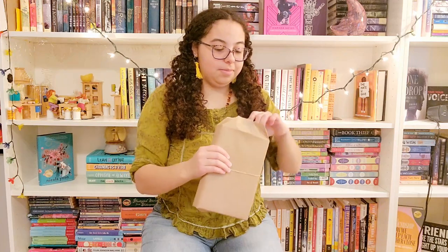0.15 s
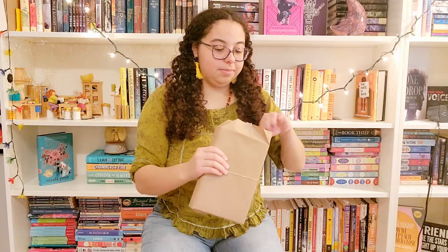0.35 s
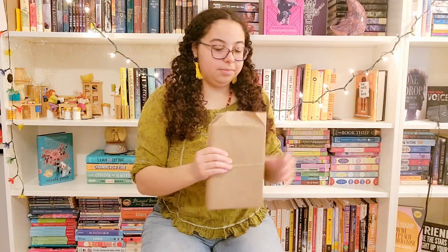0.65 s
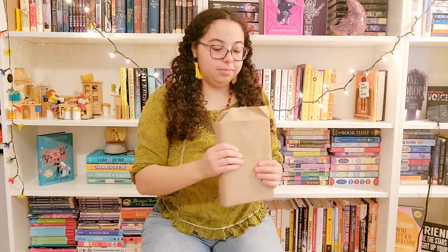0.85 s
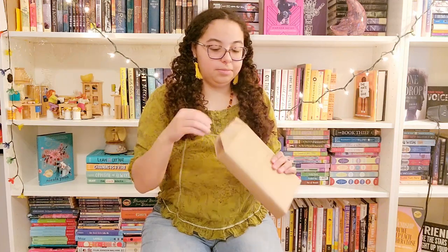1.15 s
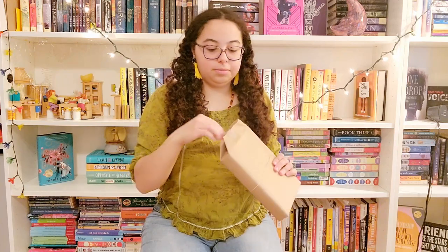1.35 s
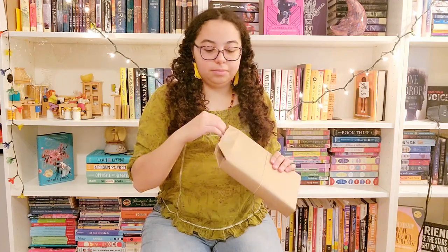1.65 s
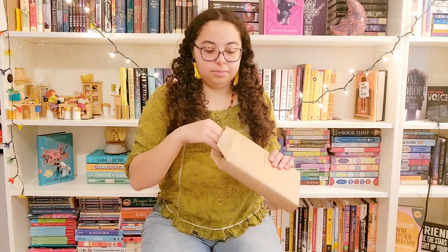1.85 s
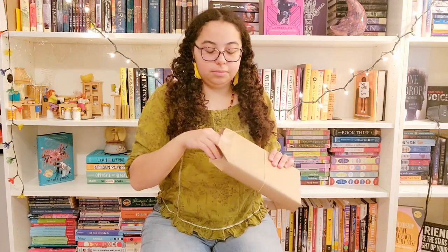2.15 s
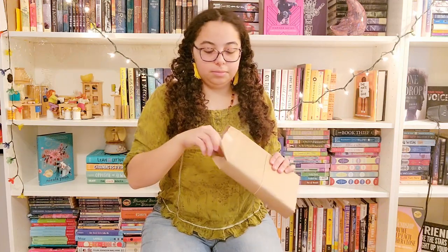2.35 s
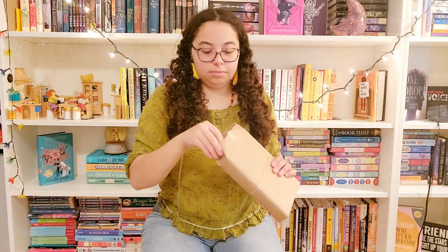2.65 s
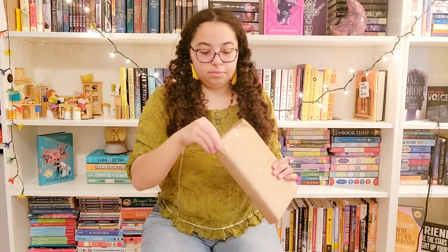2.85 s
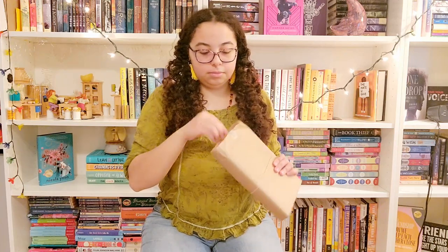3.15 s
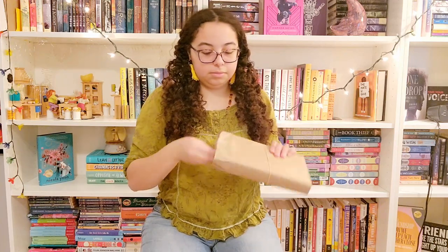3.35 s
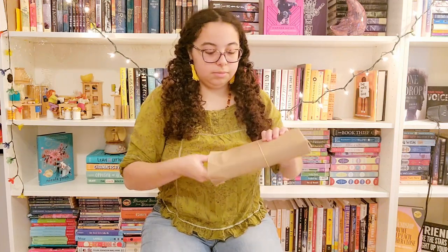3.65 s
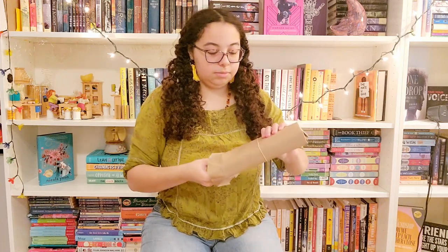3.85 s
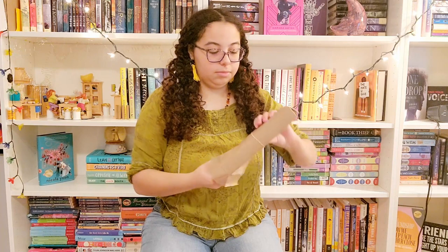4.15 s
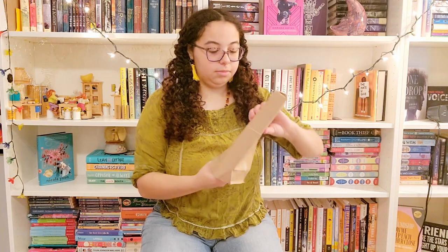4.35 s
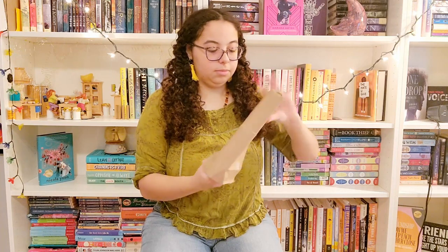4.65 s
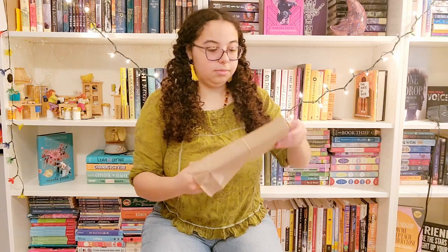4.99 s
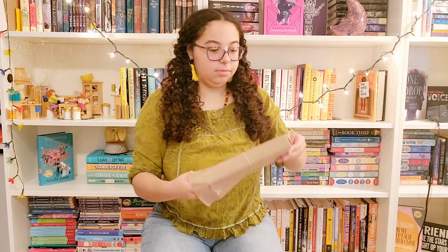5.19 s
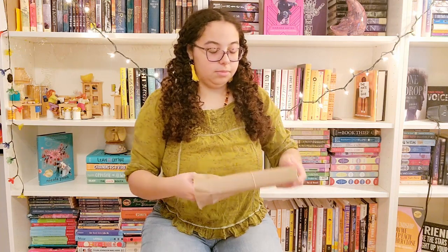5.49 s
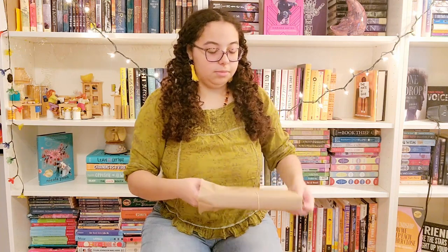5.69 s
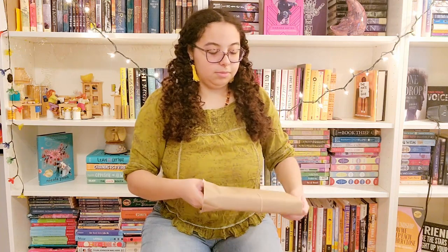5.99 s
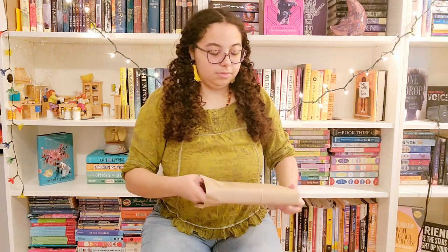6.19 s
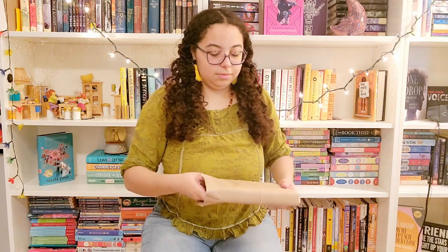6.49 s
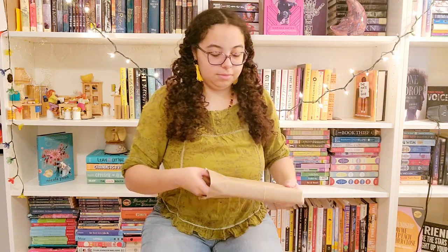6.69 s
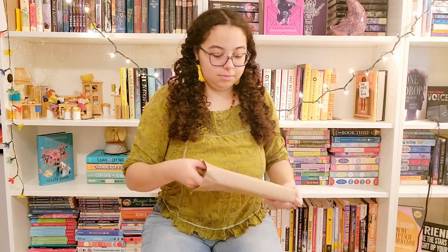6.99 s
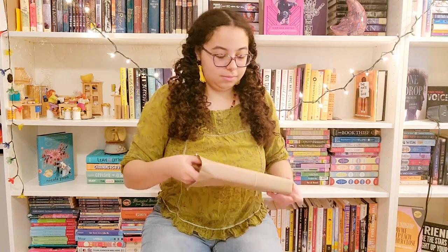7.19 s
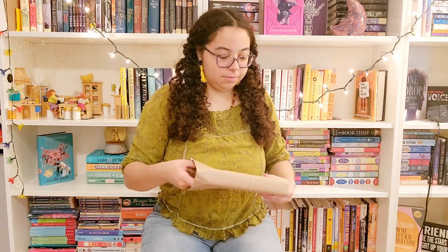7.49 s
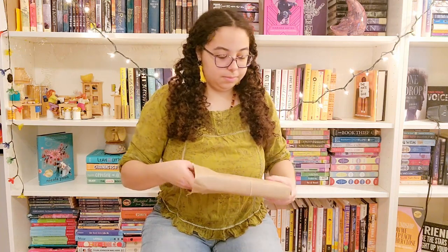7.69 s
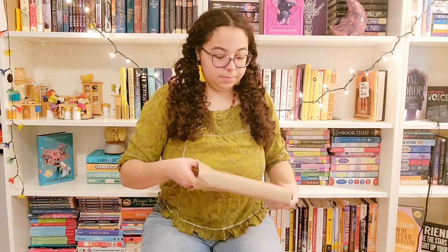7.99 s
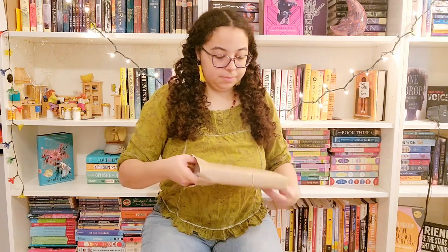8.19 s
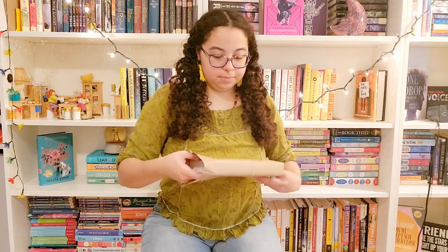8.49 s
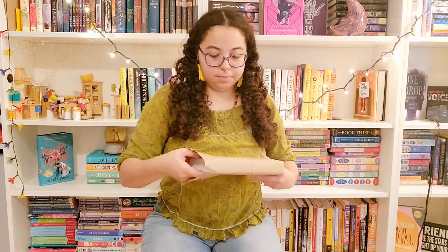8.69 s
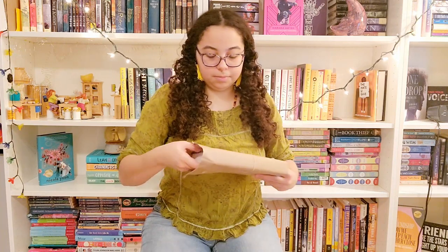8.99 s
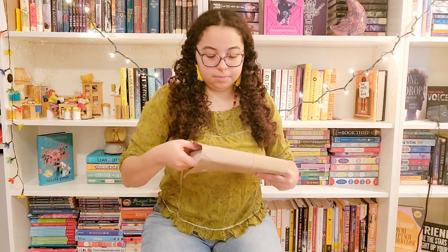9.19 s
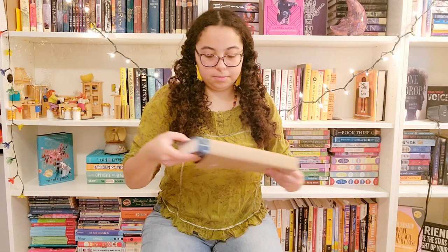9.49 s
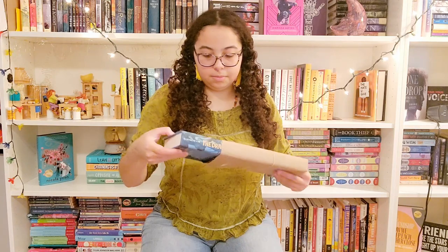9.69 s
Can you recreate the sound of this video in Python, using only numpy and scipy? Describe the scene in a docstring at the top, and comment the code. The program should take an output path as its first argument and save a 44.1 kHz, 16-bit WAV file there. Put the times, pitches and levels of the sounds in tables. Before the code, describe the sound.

Irregular crinkling of heavy wrapping paper around a book, with a few dull knocks and a strong sliding rustle near the end.

```python
"""Hands turn a book wrapped in kraft paper, pick its folded end open and slide the book out, in a small room.
From the start the stiff sheet snaps, crackles and rubs; a firm low knock comes just before 0.8 s.
Softer knocks follow, most closely around 3.5 s, then two hard, higher ones near 8.6 and 8.7 s.
The strongest rub and more loud snaps come after 9.3 s; a faint hum, rumble and hiss last throughout.
Paper is made of short noise bursts, tiny clicks and brief rings; knocks and hum are sine waves."""
import sys
import numpy as np
from scipy import signal
from scipy.fft import rfft, irfft, next_fast_len
from scipy.io import wavfile
from scipy.ndimage import map_coordinates

SR = 44100
rng = np.random.default_rng(int(sys.argv[2]) if len(sys.argv) > 2 else 0)


def output_pcm(signal):
    """Save a mono or channel-first signal as 16-bit PCM at the path in sys.argv[1].

    Samples are clipped to [-1, 1] before scaling.
    """
    pcm = np.clip(np.atleast_2d(signal).T, -1, 1) * 32767
    wavfile.write(sys.argv[1], SR, np.round(pcm).astype(np.int16))


N = 433944

# The sheet buckles, levels relative: t/s, time the crease takes to give/s, facet pitch f/Hz,
# level/dB, hollowness/dB, brightness/dB
BUCKLES = [(.0613, 0.0012, 1410, -33.5, -9, 5.5), (.125, 0.015, 1500, -41, -5, -3.5),
           (0.1804, 0.0012, 1590, -23, -12, -6.5), (0.3813, 0.012, 2060, -32, -11, -19.5),
           (0.3972, .002, 2100, -34, -12, 1), (0.7046, .004, 1800, -44.5, -7, -14.5),
           (.741, .006, 1850, -29, -2, -9), (.7453, 0.008, 1980, -22, -12, -9.5),
           (0.8824, 0.0011, 2700, -44, -22, 11), (0.8963, 0.00092, 2100, -36, -8.5, 10),
           (0.9447, 0.005, 1740, -44.5, -8, -27.5), (1.3884, 0.0035, 1920, -36, -12, -3.5),
           (1.475, .005, 1430, -43, -17, -16.5), (1.5033, 0.0087, 1110, -37.5, -13, -8.5),
           (1.734, 0.00031, 1820, -28.5, -31, -46), (1.768, 0.0083, 1900, -47.5, 6.5, 0.5),
           (1.8293, 0.0014, 2200, -39, -4, -23), (1.9305, 0.0046, 1770, -41, -8, -3),
           (2.105, .008, 1420, -44, -17, -29), (2.16, 0.0037, 1640, -34, -5.5, -10),
           (2.2815, .0013, 1890, -26, 1.5, 4.5), (2.297, 0.00093, 1460, -22, -2, 6.5),
           (2.3505, 0.0016, 1500, -27, -27, -23), (2.438, 0.00086, 1320, -25, -23, -18),
           (2.4599, 0.00065, 1740, -31.5, -21, -10.5), (2.6564, 0.0048, 1620, -38, -23, -28.5),
           (2.688, .0004, 1330, -37.5, 0.5, -33.5), (2.8116, 0.0013, 1330, -30, -14.5, -44),
           (2.824, .001, 1720, -37, -3, -5.5), (2.85, 0.0014, 1350, -31, -12, -54),
           (2.9353, 0.0017, 1500, -33, -25, -31), (3.265, 0.0045, 2100, -26.5, -4.5, -6.5),
           (3.269, 0.0017, 1740, -22, -17, -13.5), (3.2912, .0025, 1130, -28, -14, -23),
           (3.3395, 0.0018, 2200, -38, -1.5, -10), (3.3883, 0.002, 1910, -40.5, -13, -24),
           (3.556, 0.0021, 2100, -37, 4, -21), (3.7026, 0.0013, 1400, -43, -1, -1.5),
           (3.9999, 0.00077, 2980, -30.5, -13, 1.5), (4.004, 0.00067, 2400, -43, 2, 9),
           (4.1323, 0.0017, 1640, -42, 7, -29), (4.3446, 0.0035, 1650, -37.5, -4, -1),
           (4.3622, 0.0023, 2800, -24.5, -9, -5.5), (4.4607, 0.00048, 1560, -29.5, -13.5, -15.5),
           (4.543, .0026, 1820, -43, 0, -8.5), (4.6344, .0014, 1620, -26, -13, 1.5),
           (4.902, .004, 2570, -52, -2, -13.5), (4.989, .007, 1900, -51, -3, -8),
           (5.0832, 0.0021, 1480, -28.5, -13.5, -3.5), (5.154, 0.0099, 2600, -34, -8.5, -18),
           (5.183, 0.002, 2480, -31, -8.5, -18.5), (5.398, 0.0026, 2330, -40, -2.5, -6.5),
           (5.5098, 0.0062, 1380, -41, -4, -6.5), (5.589, .01, 1880, -35, -14, -17),
           (5.6193, 0.005, 2120, -38.5, -11, -23), (5.7685, 0.0025, 2460, -28.5, -32, -17),
           (5.948, 0.0022, 2280, -37, -6.5, -12.5), (6.0, .006, 1450, -47.5, 0, -16),
           (6.32, .009, 2410, -46, -15, -3), (6.1393, 0.0023, 1900, -24.5, -19.5, -13),
           (6.4575, 0.004, 1630, -37, -13, -7.5), (6.473, 0.0036, 1710, -35, -3.5, 7),
           (6.6224, .001, 1820, -26.5, -14.5, -28), (6.7147, 0.0032, 1670, -34.5, -8.5, -25),
           (6.845, .003, 1510, -42.5, -8, -6), (6.9013, 0.0095, 1630, -24, -12, 1),
           (6.9209, 0.004, 2020, -26.5, -13, -1), (7.0182, 0.0017, 1540, -26.5, -12, -6.5),
           (7.306, 0.0054, 1520, -40.5, -9, -17), (7.345, 0.01, 1600, -44, -8, -18),
           (7.3697, .002, 2200, -40, -13, -23), (7.4498, 0.0021, 1830, -36, -9, 2.5),
           (7.5032, .0023, 1270, -35, -9.5, -11.5), (7.595, 0.0018, 1690, -31.5, -8.5, -4),
           (7.748, 0.014, 2020, -36.5, -8, -21), (7.773, 0.0018, 1340, -44, 6, -2.5),
           (7.8583, .002, 1510, -26.5, -16, -0.5), (8.041, .0044, 1830, -43, -7, -27),
           (8.1858, 0.0033, 2270, -37.5, -27, -36), (8.1999, .004, 2100, -42.5, -9, -22),
           (8.2456, 0.0029, 1680, -33, -6, -18), (8.442, 0.0017, 1840, -41, -2.5, -3.5),
           (8.5701, 0.0062, 1200, -24.5, -14.5, -26.5), (8.5868, 0.0014, 1490, -17, -38, -4),
           (8.7226, 0.003, 1350, -29.5, -7, -14.5), (8.7502, .0037, 2080, -32.5, -5, -19),
           (8.811, .008, 1490, -40.5, -9, -26.5), (8.8917, 0.0071, 1820, -28, -40, -15.5),
           (9.065, 0.016, 2800, -38, -4, -11), (9.378, 0.0027, 1050, -18.5, -11.5, -14),
           (9.438, .0026, 1150, -24, -4.5, -5.5), (9.6423, 0.0051, 1790, -26, -8.5, -1.5),
           (9.761, .003, 960, -23, -18, -1)]


def snaps(grain_db=5, quick_s=0.00078, facet_width=1.147, crisp_hz=3500):
    """A crease gives in one flip or many tiny slips, shaking the air pocket, stiff facet and small wrinkles."""
    hollow_db, crack_db, crisp_db, fizz_db = 21, 18, 17, 21
    # a bright snap, or one from a small high facet, shakes the small wrinkles harder
    crisp_per_bright, crisp_db_per_octave, usual_facet_hz = 0.39, 9, 1714
    out = np.zeros((2, N))
    t = np.arange(SR // 20) / SR
    for s, give_s, hz, db, hollow, bright in BUCKLES:
        crisp = crisp_per_bright * bright + crisp_db_per_octave * np.log2(hz / usual_facet_hz)
        swell_and_fade = (1 - np.exp(-3 * t / give_s)) * np.exp(-t / give_s)
        grain = amp(grain_db * wobble(1541, count=len(t)))
        slips = rng.standard_normal(len(t)) * swell_and_fade * grain
        # the quicker the crease gives, the more of its energy goes into the single flip
        flip_share = np.exp(-give_s / quick_s)
        slips *= np.sqrt(1 - flip_share) / np.linalg.norm(slips)
        slips[np.argmax(swell_and_fade) // 2] += np.sqrt(flip_share)
        # each facet rings for a few cycles at its own pitch
        facet = band(slips, hz / facet_width, hz * facet_width, order=1)
        parts = [
            (band(slips, 277, 913), hollow + hollow_db),
            (-band(facet, 776, 3430), crack_db),
            (band(slips, crisp_hz / 1.42, crisp_hz * 1.56), crisp + crisp_db),
            (-band(slips, 3900, 13600), bright + fizz_db),
        ]
        snap = sum(amp(db + level) * part / np.linalg.norm(part) for part, level in parts)
        add(out, s, snap)
    return out


def crinkles(rustle, rate=42, pitch_hz=1900, pitch_spread=0.43, cycles=1.22):
    """Small wrinkles flip at random, each a short ring at its own pitch, louder when the rustle is louder."""
    size_db, spread_db, loudest_rustle_db = 10.5, 1.5, -39
    out = np.zeros(N + SR)
    t = np.arange(SR // 80) / SR
    candidates = 1000
    for when, keep, pitch, size in rng.random((candidates, 4)):
        # keep about `rate` wrinkles a second
        if keep >= rate * N / SR / candidates:
            continue
        bell = np.clip(np.log(pitch / (1 - pitch)) / 2, -2, 2)
        hz = pitch_hz * np.exp(pitch_spread * bell)
        start = int(when * N)
        # a fast slide holds the sheet taut, so the wrinkles grow only up to a limit
        db = min(rustle[start], loudest_rustle_db) + size_db + spread_db * min(-np.log(size), 2)
        ring = np.exp(-t * hz / cycles) * np.sin(2 * np.pi * hz * t)
        out[start:start + len(t)] += amp(db) * ring
    return wandering(out[:N])


# Tone colour of rubbed paper: f/Hz, relative level/dB
PAPER_TONE = [(120, -12), (270, 0), (400, -3), (600, -4), (1000, -1), (1500, -1), (2500, -3), (4000, -7),
              (5600, -7), (7500, -13), (10000, -16), (16000, -18)]


def rubbing(rustle, hiss, catch_rate=2000, spread_db=5, clump_db=3, slide_db=-3):
    """Fibres slide with a smooth hiss and catch in clumps of tiny clicks; the sheet colours both."""
    # the air under the paper booms with any movement, but grows more slowly than the rustle
    usual_rustle_db, usual_hollow_db, hollow_growth = -52.5, -57.5, 0.77
    hollow = usual_hollow_db + hollow_growth * (rustle - usual_rustle_db)
    # faster sliding is louder and packs the catches closer together
    chance = np.clip(catch_rate / SR * amp(rustle - usual_rustle_db), .03, .8)
    uneven_sizes = spread_db * np.minimum(rng.exponential(size=N), 4)
    clumps = clump_db * (0.5 - chance) * wobble(90)
    sizes = amp(uneven_sizes + clumps)
    clicks = (rng.random(N) < chance) * rng.choice([-1, 1], N) * sizes
    catches = unit(clicks / np.sqrt(chance))
    friction = catches + amp(slide_db) * rng.standard_normal(N)
    paper = filtered(wandering(friction), lambda hz: amp(along(PAPER_TONE, hz)))

    def above(hz, edge_hz):
        """Let through what lies above a soft edge."""
        return 1 / (1 + (edge_hz / (hz + 1)) ** 8)

    boom = unit(filtered(paper, lambda hz: above(hz, 186) - above(hz, 900)))
    body = unit(filtered(paper, lambda hz: above(hz, 1150) - above(hz, 5800)))
    top = unit(filtered(paper, lambda hz: above(hz, 5440)))
    return boom * amp(hollow - 1) + body * amp(rustle - 2) + top * amp(hiss)


# Paper is drawn over fingers, itself or the book, levels before unevenness: start t/s, length/s,
# level/dB, swell from start to end/dB, hiss against rustle/dB
STROKES_OF_PAPER = [(0, 0.15, -50, 2, -5.5), (0.291, .12, -48, 12.5, -10.5), (1.295, 0.11, -55, 13.5, 0),
                    (1.393, 0.13, -50.5, -3.5, -4.5), (1.897, 0.099, -49.5, -1, -3.5),
                    (2.121, .1, -52, -1, -2.5), (2.241, 0.12, -42, 7, -24), (2.564, 0.12, -49, -2.5, -10.5),
                    (3.15, 0.11, -47, 0, 2), (3.476, 0.14, -52.5, 1.5, -16.5),
                    (3.724, 0.15, -51, -0.5, -13), (3.916, 0.1, -44.5, 10.5, -4.5),
                    (4.288, 0.079, -45, 9.5, -7.5), (5.098, 0.077, -46.5, -1, -7),
                    (5.55, .17, -51.5, -11, -8.5), (5.737, .08, -43.5, -5, -10),
                    (6.297, 0.15, -57.5, -15.5, 1.5), (6.571, 0.1, -46, 3, -17), (6.839, .06, -49, -3, 3.5),
                    (6.915, .12, -38, -9.5, -4), (7.23, .2, -64, 1, 2.5), (7.341, .15, -49, 2, -12.5),
                    (7.618, 0.15, -55, -10, 1.5), (8.174, 0.076, -45.5, -3.5, -21),
                    (8.491, .11, -49.5, 6, 2.5), (8.685, 0.13, -49, -8.5, -25),
                    (8.871, 0.1, -45, -3.5, -8.5), (9.044, 0.18, -48, -6, -25),
                    (9.268, 0.12, -41, 15, -5.5), (9.376, 0.2, -31, -6, -1.5), (9.587, 0.18, -44, -4, -5)]
# Faint rustle of hands holding and turning the parcel, before unevenness: t/s, level/dB
HOLDING = [(0, -57.5), (.44, -59.5), (.55, -76.5), (1.68, -85.5), (1.76, -66.5), (2.97, -65), (3.101, -78),
           (3.2, -57), (4.62, -57.5), (4.74, -70.5), (5.33, -62.5), (5.599, -57.5), (6.72, -57),
           (6.81, -66.5), (7.2, -65), (7.351, -59), (8.079, -55), (9.84, -51)]


def movement(grip_hiss_db=-4, attack_s=0.011, release_s=0.015):
    """Adds up the power of grip, strokes and the stir around each snap; gives rustle and hiss levels in dB."""
    # the rustle rises as the sheet is strained before a snap, and dies quickly as it settles after
    strain_db, strain_rise_db_per_s = -21.5, 707.5
    settle_db, settle_fall_db_per_s, settle_hiss_db = -21.5, 262, 2.5
    rustle = amp(np.interp(np.arange(N) / SR, *np.transpose(HOLDING))) ** 2
    hiss = rustle * amp(grip_hiss_db) ** 2
    offsets = np.arange(-SR // 10, SR // 2)
    t = offsets / SR
    strain = strain_db + strain_rise_db_per_s * t
    settling = settle_db - settle_fall_db_per_s * t
    stir_db = np.where(t < 0, strain, settling)
    moves = [(s, amp(db + stir_db), bright + settle_hiss_db) for s, _, _, db, _, bright in BUCKLES]
    for s, length_s, db, swell_db, hiss_db in STROKES_OF_PAPER:
        take_hold = 1 - np.exp(-np.maximum(t, 0) / attack_s)
        let_go = np.exp(-np.maximum(t - length_s, 0) / release_s)
        swell = swell_db * (np.clip(t / length_s, 0, 1) - .5)
        moves.append((s, take_hold * let_go * amp(db + swell), hiss_db))
    for s, gain, hiss_db in moves:
        at = round(s * SR) + offsets
        inside = (at >= 0) & (at < N)
        rustle[at[inside]] += gain[inside] ** 2
        hiss[at[inside]] += (gain[inside] * amp(hiss_db)) ** 2
    # paper sticks and slips, so the rustle is never even
    uneven_db = 2 * wobble(35)
    return 10 * np.log10(rustle) + uneven_db, 10 * np.log10(hiss) + uneven_db / 2


# Resonances of the parcel among the shelves: f/Hz, width/Hz, level/dB against the driving sound
RESONANCES = [(322, 13, -15), (1046, 28, 4), (1500, 188, 0), (2172, 240, 0), (3290, 500, -4.5),
              (5410, 260, -6.5)]


def coloured(x):
    """Each resonance rings on top of the sound that drives it."""
    def response(f):
        """The plain sound plus one peak for each resonance."""
        total = 1
        for centre, width, db in RESONANCES:
            total = total + amp(db) * 1j * f * width / (centre ** 2 - f ** 2 + 1j * f * width)
        return total
    return filtered(x, response)


# The parcel is bumped and gripped, level before the soft attack and the room:
# t/s, level/dB, pitch f/Hz, time to fall by 60 dB/s
BUMPS = [(.746, -35, 237, 0.055), (.778, -17, 243, 0.037), (1.502, -34.5, 380, 0.045),
         (2.318, -33, 178, 0.04), (3.267, -29, 167, 0.042), (3.34, -27.5, 310, 0.032),
         (3.555, -36, 328, 0.078), (3.585, -30.5, 257, 0.044), (3.642, -36, 337, 0.065),
         (4.132, -35.5, 650, .045), (5.135, -39, 262, 0.19), (6.256, -32.5, 275, 0.039),
         (8.587, -20, 662, 0.052), (8.748, -15.5, 607, 0.013)]


def knocks(attack_s=0.0017, wet_db=-5):
    """The padded book answers a soft blow with a few low cycles, heard mostly straight from the parcel."""
    out = np.zeros((2, N))
    t = np.arange(SR // 6) / SR
    for s, db, hz, t60 in BUMPS:
        fade = amp(db - 60 * t / t60)
        soft_attack = 1 - np.exp(-t / attack_s)
        add(out, s, fade * soft_attack * np.sin(2 * np.pi * hz * t), wet_db)
    return out


def wandering(x):
    """The contact wanders over the parcel, so its path through the room changes six times a second."""
    heard = np.zeros((2, N))
    step = SR // 6
    for start in range(0, N, step):
        add(heard, start / SR, x[start:start + step])
    return heard


def add(out, s, sound, wet_db=0):
    """Mix in a sound that leaves the parcel at time s, carried by a fresh path to the microphones."""
    heard = signal.fftconvolve(sound[None], path(wet_db), axes=1)
    place = out[:, max(round(s * SR), 0):][:, :heard.shape[1]]
    place += heard[:, :place.shape[1]]


# How long the room rings: f/Hz, time to fall by 60 dB/s
ROOM_FADE = [(200, 0.23), (1500, 0.18), (5000, 0.2), (9000, 0.15), (15000, 0.18)]
# Reverberation before build-up and wet level: f/Hz, level/dB against the direct sound
ROOM_TONE = [(150, 4.5), (500, 0.5), (1500, 0.5), (3000, 3), (5500, 3), (8000, 3), (15000, -4.5)]


def path(wet_db, lead_s=.00004, bounce_s=.0052, bounce_db=-5, build_s=0.00098):
    """From one spot on the parcel to both microphones: direct sound, one strong bounce, the room's tail."""
    count = SR // 3
    hz, t, spectrum = signal.stft(diffuse(count), SR, nperseg=256)
    t60 = along(ROOM_FADE, hz)[:, None]
    decay = amp(along(ROOM_TONE, hz)[:, None] - 60 * t / t60)
    # long and short tails start from equal energy
    fade = decay * np.sqrt(2 * np.log(1000) / (t60 * SR))
    tail = signal.istft(spectrum * fade, SR, nperseg=256)[1][:, :count]
    tail *= 1 - np.exp(-np.arange(count) / (build_s * SR))
    # the spot is usually slightly nearer to the left microphone
    skew = np.array([[-.5], [.5]]) * lead_s * SR * rng.normal(1, 0.49)
    k = np.arange(count) - 8  # room for the start of the pulse

    def arrival(s):
        """One short pulse, placed between samples."""
        delay = round(s * SR)
        return np.sinc(k - delay - skew) * (abs(k - delay) <= 8)

    bounce = amp(bounce_db) * arrival(bounce_s + rng.normal(0, .0003))
    return arrival(0) + amp(wet_db) * (tail + bounce)


# Sound from all sides: f/Hz, left-right likeness (1 = same, 0 = unrelated)
LIKENESS = [(100, 0.79), (330, 0.84), (700, 0.25), (1400, 0), (3000, 0.12), (7000, 0)]


def diffuse(count):
    """Noise from all sides: alike at both microphones in the bass, nearly unrelated in the treble."""
    def shares(hz):
        """How much of the shared and the opposite noise to use."""
        turn = np.arccos(np.clip(along(LIKENESS, hz), -1, 1)) / 2
        return np.array([np.cos(turn), np.sin(turn)])
    mid, side = filtered(rng.standard_normal((2, count)), shares)
    return np.array([mid + side, mid - side])


# Tone colour of the still room: f/Hz, relative level/dB
AIR_TONE = [(20, -11.5), (45, -7.5), (90, -9.5), (140, -13.5), (220, -18.5), (460, -24.5), (900, -31),
            (2000, -35.5), (5400, -37.5), (9000, -51.5), (16000, -54)]
# Hum of an appliance, before its slow wavering: f/Hz, rms level/dB
APPLIANCE_HUM = [(47.5, -61.5), (119.5, -61.5)]


def still_room(air_db=-57, waver_db=-1.5):
    """Low rumble and hiss from filtered noise, with sine hums unsteady in level and phase."""
    t = np.arange(N) / SR
    hum = np.zeros(N)
    for hz, db in APPLIANCE_HUM:
        level = np.sqrt(2) * amp(db + waver_db * wobble(1.66))
        hum += level * np.sin(2 * np.pi * hz * t + 0.54 * wobble(5.1))
    air = unit(filtered(diffuse(N), lambda hz: amp(along(AIR_TONE, hz))))
    return hum + amp(air_db) * air


def amp(db):
    """Decibels to gain."""
    return 10 ** (np.asarray(db) / 20)


def unit(x):
    """Scaled to rms 1."""
    return x / np.sqrt(np.mean(x ** 2) + 1e-20)


def along(points, hz):
    """Reads a table of (f/Hz, value) between its points, on a log frequency axis."""
    f, v = np.transpose(points)
    return np.interp(np.log(hz + 1), np.log(f + 1), v)


def wobble(rate, count=N):
    """A random curve of rms 1: straight lines between `rate` random points a second."""
    knots = rng.standard_normal(int(count * rate / SR) + 4)
    return unit(map_coordinates(knots, [np.arange(count) * rate / SR], order=1))


def filtered(x, response):
    """Scales each frequency of x by response(f/Hz)."""
    n = x.shape[-1]
    m = next_fast_len(n + 2048)  # spare room so the end does not wrap onto the start
    return irfft(rfft(x, m) * response(np.fft.rfftfreq(m, 1 / SR)), m)[..., :n]


def band(x, lo_hz, hi_hz, order=2):
    """Keeps the band between two frequencies, with no sound before its cause."""
    edges = [lo_hz, min(hi_hz, SR / 2 - 1)]
    return signal.sosfilt(signal.butter(order, edges, "band", fs=SR, output="sos"), x)


def scene(left_db=0.51):
    """The parcel and the room, a little louder on the left."""
    rustle, hiss = movement()
    paper = coloured(snaps() + crinkles(rustle) + rubbing(rustle, hiss))
    return (paper + knocks() + still_room()) * amp([[left_db], [-left_db]])


def record(dry, top_hz=16000):
    """The microphone pair's signal is clipped at full scale, then cut off at its upper band limit."""
    return filtered(np.clip(dry, -1, 1), lambda hz: hz < top_hz)


dry = scene()
out = record(dry)
output_pcm(out)
```